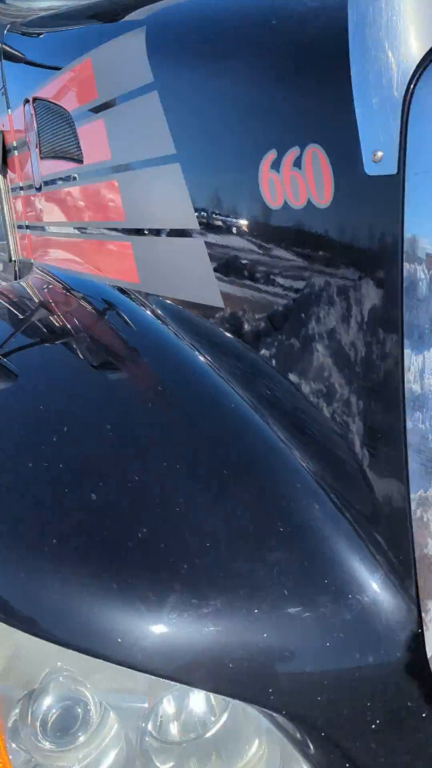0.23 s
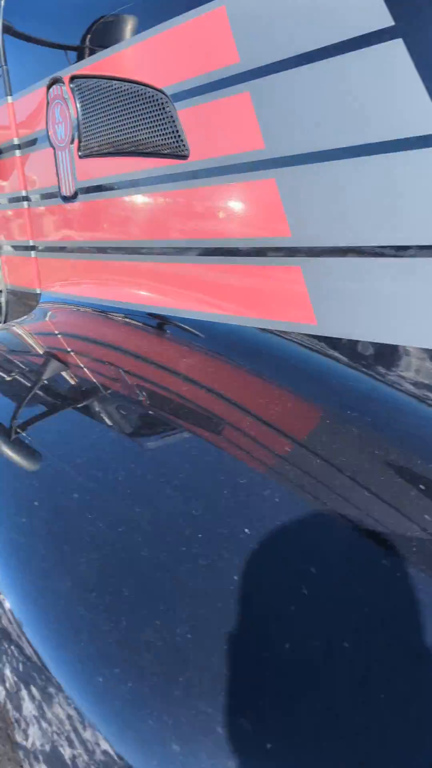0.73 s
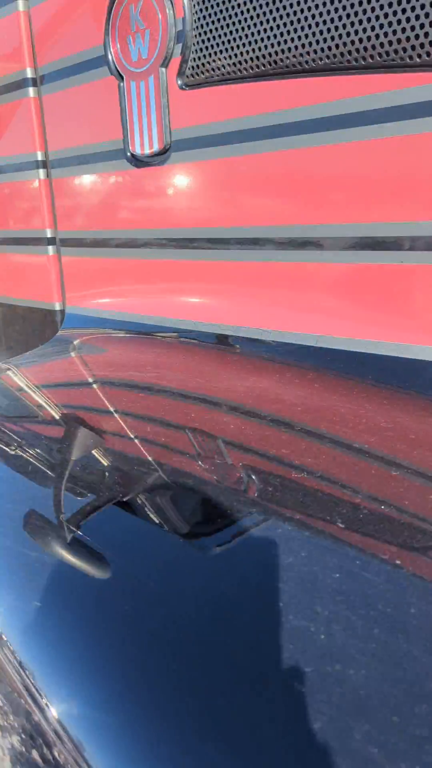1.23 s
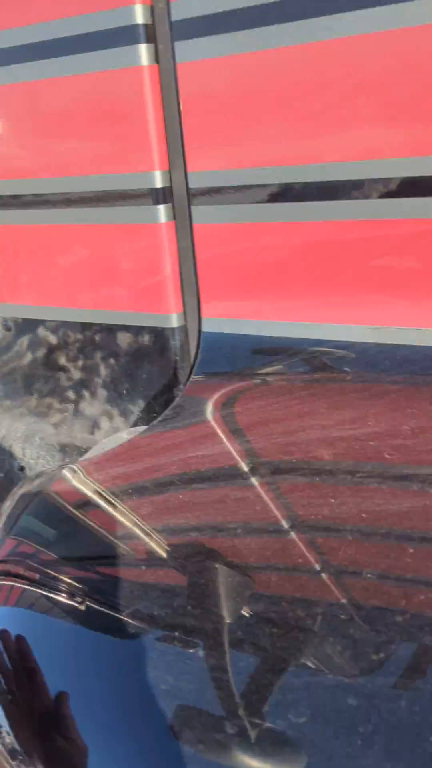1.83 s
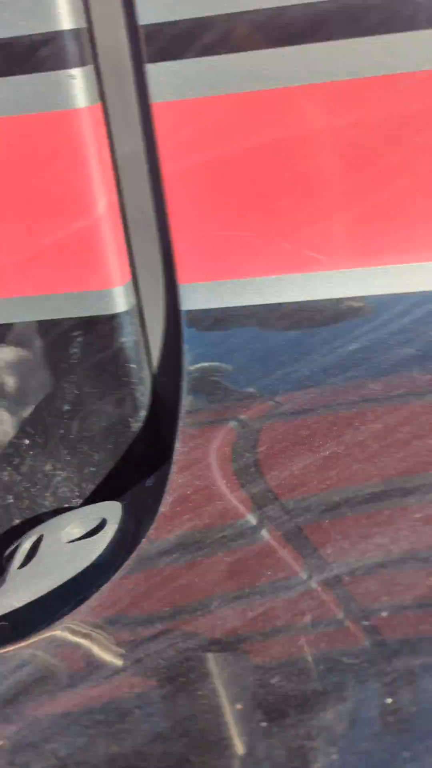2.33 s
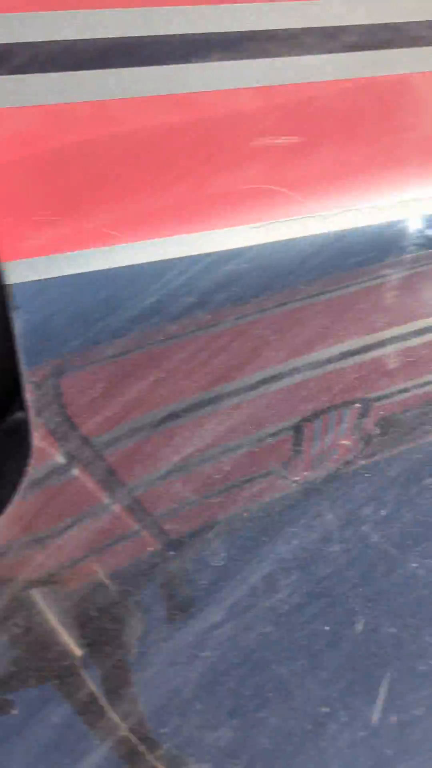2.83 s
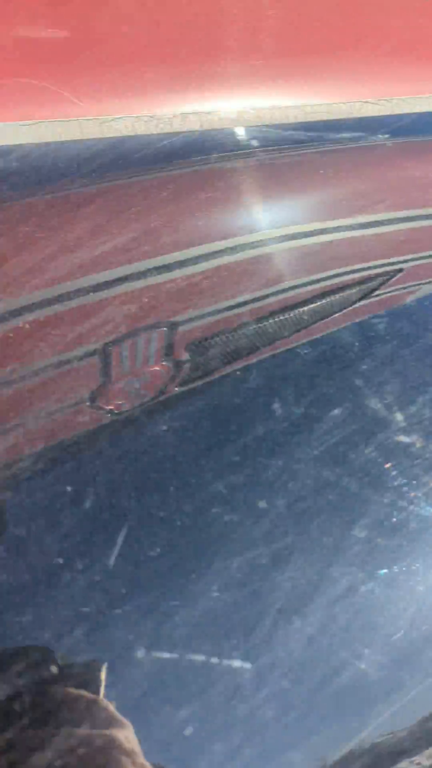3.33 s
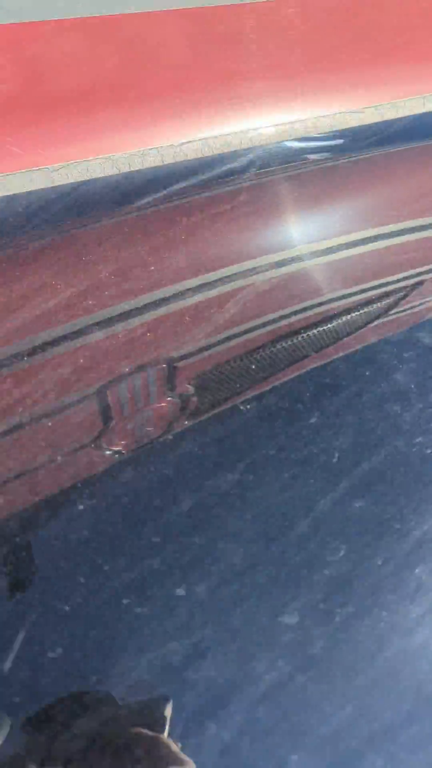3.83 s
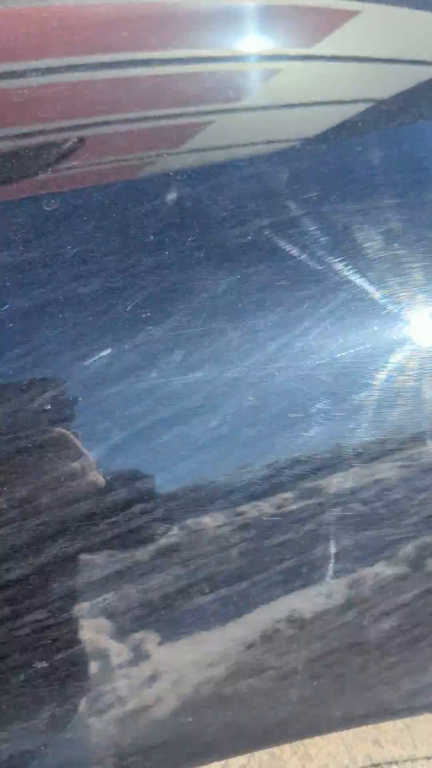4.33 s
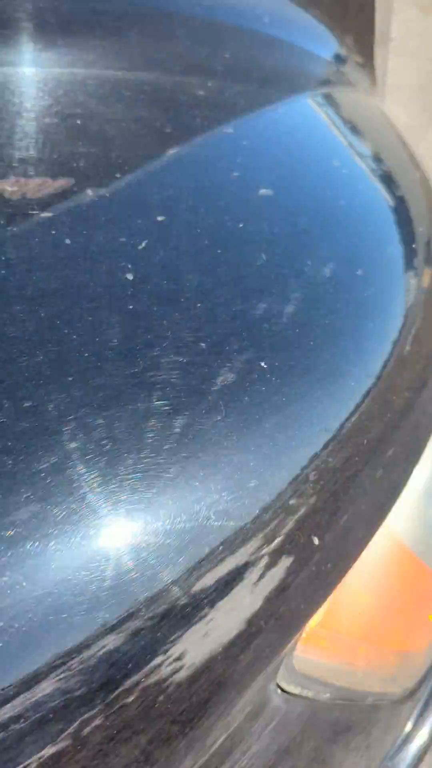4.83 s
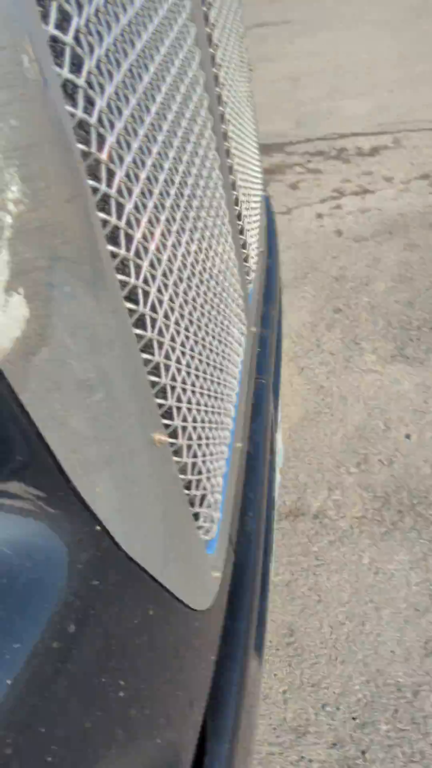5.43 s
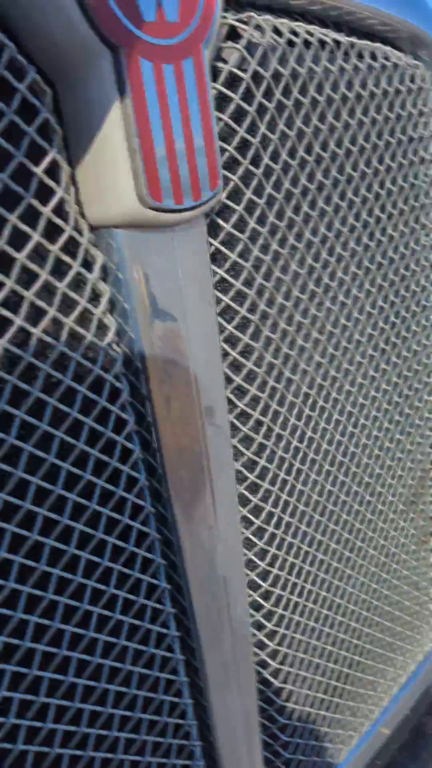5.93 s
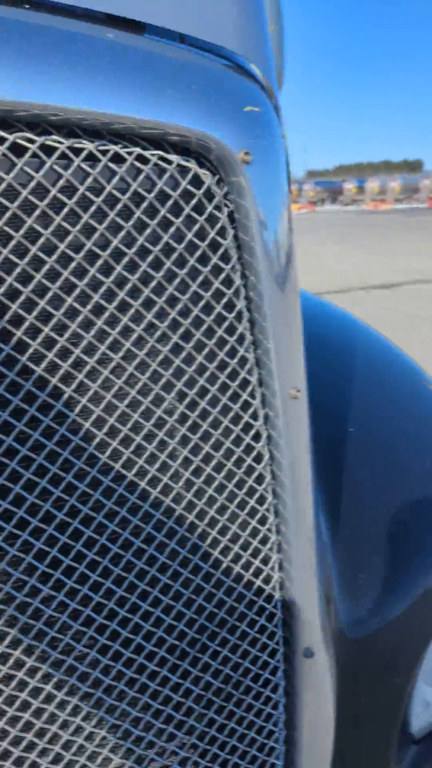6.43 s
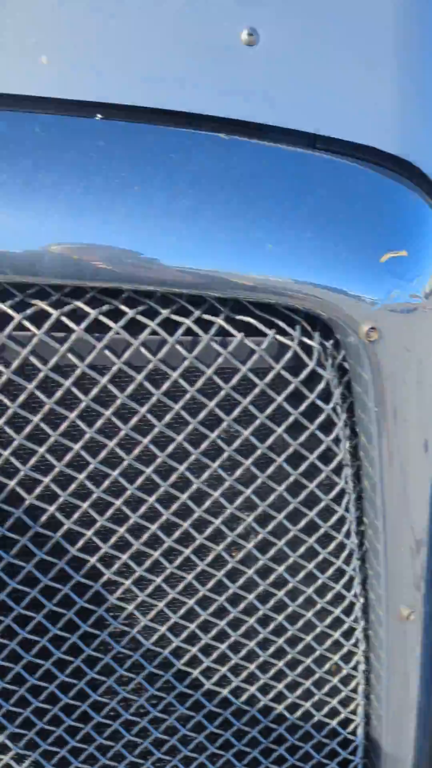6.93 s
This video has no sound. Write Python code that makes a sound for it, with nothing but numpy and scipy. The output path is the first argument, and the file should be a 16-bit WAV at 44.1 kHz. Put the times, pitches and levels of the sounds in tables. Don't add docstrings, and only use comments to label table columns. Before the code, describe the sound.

A big diesel truck idles continuously in an open yard, low throbbing rumble under valve clatter and fan hiss. A handheld phone moves from grille to fender and back, so the knocking grows, thins, then turns boomy. Finger knocks and brief rubs hit the panels around three and four seconds; wind flutters at the start and thumps near the end.

```python
import sys
import numpy as np
from scipy import signal
from scipy.fft import rfft, irfft
from scipy.io import wavfile
from scipy.ndimage import uniform_filter1d

SR = 44100
rng = np.random.default_rng(int(sys.argv[2]) if len(sys.argv) > 2 else 0)


def invert_db(x):
    u = np.asarray(x, float) / 20
    return 10 ** u


def wav_out(sig):
    wavfile.write(sys.argv[1], SR, np.round(np.clip(np.atleast_2d(sig).T, -1, 1) * 32767).astype(np.int16))


N = 317079
TIME = np.arange(N) / SR
SIDES = np.array([[1], [-1]])
CYCLE_HZ = 22.85
STEP = 32


def unit(x):
    return x / np.sqrt(np.mean(x ** 2))


def curves(table):
    seconds, *columns = np.transpose(table)
    return [np.interp(TIME, seconds, column) for column in columns]


def gains(table):
    hz, db = np.transpose(table)
    return invert_db(np.interp(np.log(np.fft.rfftfreq(N, 1 / SR) + 1), np.log(hz + 1), db))


def noise(table):
    return unit(irfft(rfft(rng.standard_normal((2, N))) * gains(table), N))


def band(x, lo_hz, hi_hz):
    return signal.sosfilt(signal.butter(2, [lo_hz, hi_hz], "band", fs=SR, output="sos"), x)


def wander(rate, step=1):
    hold, size = int(SR / rate / step), -(-N // step)
    held = np.repeat(rng.standard_normal(size // hold + 1), hold)
    return 1.74 * uniform_filter1d(uniform_filter1d(held, hold), hold)[:size]


def hump(t, middle_s, half_s):
    return np.exp(-((t - middle_s) / half_s) ** 2)


def add(track, sound, s):
    i = int(s * SR)
    track[:, i:i + sound.shape[1]] += sound[:, :N - i]


# time in seconds, closeness to the engine in dB,
# view into the wheel arch 0-1, shading of the engine bay in dB.
STANCE = [(0, 0, 0, -3), (.55, -1, 0.04, -2), (1.0, -0.5, 0.2, -1), (1.6, 0, 0.5, 1), (2.2, 1, 0.87, 0.5),
          (2.7, -1, 0.96, 1), (3.6, 0, 0.93, 2), (3.82, -6.5, 1, 0.5), (4.0, 2.5, 0.89, 2),
          (4.55, -2.5, 0.64, 1.5), (4.87, -8.5, 0.41, -5), (5.15, -8, 0.11, -6.5), (5.45, -3, 0.07, -6),
          (5.78, -0.5, 0.14, -3.5), (6.0, 11, 0.09, -3.5), (6.35, 7.5, 0.19, 0.5), (6.62, 3.5, 0.7, 0),
          (7.19, 9, 0.05, -4)]


def engine_levels():
    close_db, arch, _ = curves(STANCE)
    beat = abs(1 - 0.38 * np.exp(2j * np.pi * 1.155 * (TIME - 0.83)))
    boom_db = -37 + close_db + 20 * np.log10(np.clip(beat, 0.1, 2))
    block_db = -51 + 0.84 * close_db + 14 * np.clip(arch / 0.24, 0, 1)
    knock_db = -54.5 + 0.66 * close_db + 17 * arch
    return [boom_db, block_db, knock_db]


# multiple of the cycle rate, level beside the fender in dB,
# level in front of the grille in dB.
STRONG_ORDERS = [(3, -1.5, -12), (4, -1, 0), (5, -8, -13), (6, -4.5, -12.5), (7, -4, -7), (8, -2, -10.5),
                 (9, -20.5, -27), (10, -5.5, -28.5), (11, -3, -16.5), (12, -10, -3.5), (13, -16.5, -11.5),
                 (14, -19.5, -15), (15, -18, -13.5), (16, -9, -23), (17, -9, -9.5), (18, -2.5, -25),
                 (19, 0.5, -15.5), (20, -16.5, -29), (21, -24.5, -25), (22, -10, -16.5), (23, -5.5, -34),
                 (24, -9, -17.5), (25, -15, -24), (26, -25.5, -41.5), (28, -10.5, -26.5), (29, -7.5, -12),
                 (30, -23.5, -39.5), (31, -6.5, -31), (32, -28, -44), (34, -31.5, -40.5), (35, -22, -30.5),
                 (38, -30, -45), (43, -15, -48.5), (44, -27, -47), (45, -28.5, -45), (46, -30, -59.5),
                 (49, -10, -50)]


def orders(count=50):
    weak_db, fall_db = np.array([-10, -16]), np.array([0.7, 0.85])
    rows = {k: (k, *(weak_db - k * fall_db)) for k in range(2, count + 1)}
    rows.update({round(row[0]): row for row in STRONG_ORDERS})
    return [(1, -29, -29), *rows.values()]


# time in seconds, share of grille sound 0-1, extra path in metres,
# lag of the left port in samples, left minus right in dB.
WALK = [
    (0, 1, 0.21, -19, 1),
    (.5, 0.69, 0.091, -4, -1),
    (1.5, 0.16, -0.19, 2, -1.4),
    (2.5, 0.36, -0.95, 10.5, -1),
    (3, 0.28, -0.59, 14, -1),
    (3.6, 0.47, -0.69, 12.5, -0.5),
    (4.5, 0.09, 0.08, 13, -1.5),
    (5.1, 0.6, 0.85, -6.5, 0),
    (5.6, 0.62, 0.83, -2, -0.5),
    (7.19, 0.93, 1, -8, -1),
]
ARRIVAL = [(3, 1.27), (5, 1.2), (7, .94), (11, .86), (14, .76), (20, .7), (23, .3), (25, .9)]
# order, middle in seconds, half length in seconds,
# level change in dB.
SPOTS = [(3, .1, .3, 4), (3, 5.3, .6, 4.5), (4, 5.72, 0.35, -5.5), (4, 6.1, 0.099, 2.5),
         (6, 1.4, 0.45, -7.5), (6, 5.27, 0.17, 9.5), (7, 0.66, 0.61, 6.5), (7, 3.0, 0.66, 2.5),
         (7, 4.68, 0.36, 7.5), (8, 1.27, 0.54, -2), (8, 5.7, 0.2, -4.5), (8, 4.8, .4, -7.5),
         (8, 4.05, .25, 5.5), (8, 5.1, .15, 2), (10, 4, 0.39, -12), (7, 6.34, .3, -11), (12, 5.3, 0.53, 1),
         (16, 6.2, 0.47, 6.5), (14, 3.5, .45, -20), (9, 4.95, .3, 12), (3, 6.1, .2, -2.5),
         (9, 2.4, 1.2, 7.5), (10, 1.6, 0.52, -7), (10, 8.6, .25, -5), (12, 1.86, 0.3, 6.5),
         (12, 2.8, .6, -4), (11, 5.1, 0.18, 2), (12, 5.1, 0.45, -7), (13, 2, 0.79, 7), (13, 3.2, 0.78, -5),
         (13, 5.4, 0.27, -25), (15, 1.55, 0.7, 14.5), (15, 6.26, .3, 11.5), (16, 1.9, .8, -9.5),
         (16, 6.9, 0.46, 6), (17, 1.4, 0.97, 7), (17, 4.6, 0.33, -8.5), (17, 4.9, .25, 9),
         (18, 1.44, 0.15, 2), (18, 1.9, 0.67, 2.5), (18, 5.6, .4, 8), (19, 0.73, 0.23, -3.5),
         (19, 2.25, 0.16, 3), (19, 4.95, .25, -3), (24, 5, 0.56, 4), (24, 6.5, 0.46, -3.5),
         (29, 1.15, 0.43, -21), (29, 2.2, 0.5, -4.5), (29, 4.7, 0.39, -13), (29, 6.62, 0.38, -18)]


def drone(levels_db):
    share, path_m, lag, _ = curves(WALK)
    turn = np.exp(2j * np.pi * CYCLE_HZ * (TIME - path_m / 343 - lag / SR * SIDES / 2))
    slow_time, share, knock_db = TIME[::STEP], share[::STEP], levels_db[2][::STEP]
    bay_db = 0.92 * curves(STANCE)[2][::STEP]
    rows = orders()
    delays = 2 * np.pi * np.cumsum(np.interp(np.arange(len(rows) + 1), *np.transpose(ARRIVAL)))
    groups, powers, carrier = np.zeros((3, 2, N)), np.zeros((3, len(share))), 1
    for k, fender_db, grille_db in rows:
        k = round(k)
        carrier = carrier * turn
        group = int(k > 4) + int(k > 13)
        shade_db = (k > 20) * 0.5 * np.clip(knock_db + 40.5, -9, 0) * (1 - share)
        shade_db = shade_db + (8 < k < 14) * bay_db
        gain = invert_db(fender_db + share * (grille_db - fender_db) + shade_db)
        powers[group] += gain ** 2 / 2
        apart = k * wander(0.7, STEP) * SIDES
        phase = 0.12 * wander(2.99, STEP) + 0.0083 * apart - delays[k]
        phase = phase + (k > 4) * 1.2 * share * wander(1.188, STEP)
        spot_db = sum(db * hump(slow_time, s, half_s) for m, s, half_s, db in SPOTS if round(m) == k)
        drift_db = 1.3 * wander(2.628, STEP) + 0.027 * apart[:, ::-1]
        swell = gain * invert_db(spot_db + drift_db) * np.exp(1j * phase)
        groups[group] += (swell.repeat(STEP, axis=1)[:, :N] * carrier).real
    return sum(g / np.sqrt(p).repeat(STEP)[:N] * invert_db(db) for g, p, db in zip(groups, powers, levels_db))


# frequency in Hz, level in dB per Hz.
RUMBLE_COLOUR = [(20, -26), (40, -15), (65, 2.5), (110, 1), (170, -1), (250, -5), (330, -12), (450, -8),
                 (700, -21), (1100, -46), (1600, -56)]


def rumble(boom_db, block_db, knock_db):
    mid, side = noise(RUMBLE_COLOUR)
    side = 0.32 * side + 0.4 * band(side, 380, 1500)
    throb = 1 + 0.58 * np.cos(2 * np.pi * CYCLE_HZ * TIME + 0.72)
    level_db = 0.26 * boom_db + 0.2 * block_db + 0.3 * knock_db - 17
    level_db = level_db + 4.5 * curves(WALK)[0] + 0.87 * wander(9.7)
    return (mid + side * SIDES) * throb * invert_db(level_db)


# frequency in Hz, level in dB per Hz.
CLATTER_COLOUR = [(460, -12), (780, 0.5), (909, -3), (1150, -8), (1300, -6), (1580, -8.5), (1870, -5),
                  (2190, -10), (2540, -10.5), (3110, -15), (3380, -16), (4100, -24), (5330, -37),
                  (9020, -120)]
# frequency in Hz, level in dB per Hz.
HISS_COLOUR = [(2410, -44.5), (4100, -9), (4870, -8), (5300, -2), (5990, -6), (6360, -1), (6730, 0.5),
               (7770, -7.5), (8640, -8), (9660, -18.5), (11900, -20), (14700, -25.5), (15500, -28),
               (16100, -50)]


def gear():
    shade_db = curves(STANCE)[2]
    vent_db = 2.5 * hump(TIME, 1.25, 1)
    clatter_db = -52.5 + 0.75 * shade_db + vent_db
    hiss_db = -56 + 1.05 * shade_db - 2.5
    beat = 1 + 0.1 * np.cos(4 * np.pi * CYCLE_HZ * TIME + 0.5 * wander(16))
    clatter = noise(CLATTER_COLOUR) * invert_db(clatter_db + 0.6 * wander(6.4) + 0.6 * wander(60))
    clatter = clatter + band(clatter, 2170, 4700) * invert_db(-2.5) * hump(TIME, 5.88, 0.37)
    hiss = noise(HISS_COLOUR) * invert_db(hiss_db + wander(14) + 0.87 * wander(60))
    return beat * (clatter + hiss)


# frequency in Hz, level in dB.
NEIGHBOUR = [(31.5, -64.5), (39.5, -60.5), (54.3, -48)]


def neighbour():
    out = np.zeros((2, N))
    for hz, db in NEIGHBOUR:
        swell = invert_db(db - 1 + 0.4 * wander(2.1) + 2.8 * wander(15))
        lead = (0.23 + 0.12 * wander(1.4)) * SIDES
        out += swell * np.sin(2 * np.pi * hz * TIME + 0.8 * wander(1.6) + lead)
    return out


# frequency in Hz, level in dB per Hz.
WIND_COLOUR = [(30, -36), (70, 3.5), (130, 5), (250, -3), (400, -8.5), (700, -31.5), (1200, -91)]
# middle in seconds, half length in seconds, left port in dB, right port in dB.
GUSTS = [(0.083, 0.11, -36, -30.5), (0.397, 0.097, -52, -41), (0.59, 0.075, -41, -40),
         (0.675, 0.045, -47, -35.5), (0.9, 0.0685, -46, -44), (4.047, 0.033, -28, -33),
         (4.26, 0.12, -38.5, -40.5), (4.511, 0.37, -48, -50), (6.034, .07, -56, -43),
         (6.137, 0.12, -52, -60), (6.27, 0.076, -52, -29), (6.5, 0.089, -35, -30),
         (6.707, 0.068, -26.5, -29), (6.953, 0.15, -30.5, -25), (7.15, 0.086, -33, -27.5)]
# start in seconds, peak level in dB, left minus right in dB.
SLAPS = [(0.048, -43.5, -8.5), (0.071, -42, -2), (0.113, -33, 3), (0.348, -37.5, -3), (0.661, -40, 2),
         (4.266, -30.5, 0.5), (6.223, -49.5, -12), (6.527, -31.5, 6.5), (6.562, -34, -3), (6.614, -35, -1),
         (6.711, -33, 2), (6.781, -33, 1), (6.889, -34.5, -13), (6.906, -31.5, -9.5), (6.947, -30.5, -6.5),
         (6.969, -30.5, -3), (7.003, -29.5, -2.5), (7.018, -30.5, -3), (7.1, -26, 0.5), (7.153, -30.5, 9),
         (7.178, -28, 0)]


def wind():
    out = np.zeros((2, N))
    for s, half_s, *ports_db in GUSTS:
        out += invert_db(ports_db)[:, None] * hump(TIME, s, half_s)
    flutter = noise(WIND_COLOUR) * invert_db([5 * wander(32), 4.3 * wander(35)])
    out = out * flutter / np.sqrt(uniform_filter1d(flutter ** 2, 5000)) * invert_db(1.5)
    t = TIME[:2600]
    for s, db, pan_db in SLAPS:
        burst = rng.standard_normal((2, len(t))) * np.exp(-t / 0.012) * (1 - np.exp(-t / 0.00049))
        puff = band(band(band(burst, 60, 1600), 74, 1070), 94, 402)
        puff = puff / abs(puff).max(axis=1, keepdims=True)
        add(out, puff * invert_db(db + 6 + 2.71 * pan_db * SIDES / 2), s)
    return out


def hollow(x, top_hz):
    return band(band(x, 1280, top_hz), 810, 0.95 * top_hz)


# start in seconds, end in seconds, rasp in dB, panel hum in dB, edge sharpness.
RUBS = [(1.185, 1.302, -64, -66, 1.4), (2.29, 2.347, -63, -78, 1.3), (2.577, 2.724, -57.5, -65.5, 5.3),
        (2.635, 2.68, -58, -60, 1.4), (2.876, 2.899, -46.5, -48, 1.3), (3.279, 3.323, -58, -45, 2),
        (3.304, 3.327, -52, -47, 2), (3.329, 3.377, -55, -61, 1.1), (3.399, 3.475, -43.5, -50, 5.6),
        (3.422, 3.471, -41.5, -48, 1.55), (3.757, 3.78, -38, -51, 5), (4.024, 4.038, -36.5, -38, 1.5),
        (5.172, 5.286, -57, -59.5, 1.15), (6.371, 6.5, -47.5, -61, 1.12), (6.429, 6.662, -57, -75, 1.57)]
# start in seconds, end in seconds, rasp in dB,
# panel hum in dB, edge sharpness.
TRAILS = [
    (2.891, 2.905, -38.5, -36, 1.6),
    (2.906, 2.942, -56, -46, 1.2),
    (4.0035, 4.028, -29.5, -29.5, 1.1),
    (4.037, 4.061, -42, -27, 1.7),
    (6.656, 6.719, -53.5, -45, 2.1),
    (6.716, 6.77, -68, -48.5, 1.8),
]


def slides(body, rasp, top):
    for start, end, rasp_db, panel_db, edge, skew in [(*r, 1) for r in RUBS] + [(*r, 0.45) for r in TRAILS]:
        size = int((end - start) * SR)
        grain_db = 3.6 * rng.exponential(size=size // 90 + 1)
        grains = rng.standard_normal((2, size)) * invert_db(grain_db).repeat(90)[:size]
        arc = np.sin(np.pi * (np.arange(size) / size) ** skew)
        slide = unit(grains) * np.clip(edge * arc, 0, 1) ** 2
        late = start > 6.34
        scrape = slide
        if late:
            peaks = band(slide, 5080, 5450) + band(slide, 6450, 7000)
            scrape = slide * invert_db(2) + peaks * invert_db(3.5)
        add(rasp, scrape * invert_db(rasp_db), start)
        pressed_db = 0.63 * max(panel_db - rasp_db + 6, 0)
        add(top, slide * invert_db(rasp_db + 4 - 5.1 * late - pressed_db), start)
        add(body, hollow(slide, 2880) * invert_db(panel_db + 11), start)


# frequency in Hz, level in dB, 60 dB decay in seconds.
REAR_PANEL = [(1555, -17, 0.092), (1656, 1, 0.088), (1800, 7, 0.055), (1960, 5, 0.026), (2186, 7.5, 0.028),
              (2390, -9, 0.033), (2275, -7, 0.095)]
# frequency in Hz, level in dB, 60 dB decay in seconds.
FRONT_PANEL = [(1333, -3.5, 0.065), (1464, -11, 0.05), (1590, -21, 0.043), (1704, -3, 0.034),
               (1782, -1, 0.043), (1960, -4.5, 0.05), (2230, -4.5, 0.028), (2620, -25, 0.093),
               (637.5, -13, 0.055)]
# frequency in Hz, level in dB, 60 dB decay in seconds.
NAIL = [(1330, 2, .04), (5400, 7, 0.007), (4400, -2, .006), (6700, 3, .012), (8500, 3, .01),
        (11700, 5, 0.005), (12600, 11, .006)]
# frequency in Hz, level in dB, 60 dB decay in seconds.
MESH = [(1160, -13.5, 0.028), (1720, -20, 0.11), (2340, 2, 0.02), (2960, 3, 0.024), (3630, -4, 0.023),
        (4820, -2.5, 0.022), (5500, -5, 0.014), (6260, -16, 0.014), (7400, -12, .012)]
# frequency in Hz, level in dB, 60 dB decay in seconds.
CORNER = [(2270, 1, 0.087), (2080, -4, 0.066), (2620, -7, .03), (1500, -10, 0.044), (1160, -6, 0.07)]
# frequency in Hz, level in dB, 60 dB decay in seconds.
CASE = [(3340, -10.5, 0.0064), (5180, 7.5, 0.0044), (6440, 4.5, 0.006), (8150, -5, 0.0057),
        (10900, -17, 0.0056), (11880, -20, 0.005)]
PLACES_S = [
    0,
    3.72,
    3.78,
    3.9,
    4.2,
    6.3,
    6.34,
    6.7,
    6.9,
]


def ringing(push, s, contact_s):
    t = TIME[:5000]
    front = FRONT_PANEL + NAIL if abs(s - 4.035) < 0.004 else FRONT_PANEL
    places = (REAR_PANEL, CASE, REAR_PANEL, front, REAR_PANEL, MESH, REAR_PANEL, CORNER, CASE)
    modes = places[np.searchsorted(PLACES_S, s) - 1]
    ring = np.zeros(len(t))
    for hz, db, t60 in modes:
        ring += invert_db(db) * np.sin(hz * (2 * np.pi * t + 1)) * np.exp(-np.log(1000) * t / t60)
    ring = ring * (1 - np.exp(-(t / contact_s) ** 2))
    ring = signal.fftconvolve(push, ring[None])[:, :push.shape[1]]
    return ring / abs(ring).max()


# start in seconds, crack in dB, left minus right in dB.
TICKS = [(1.25, -46, -11), (2.31, -53.5, 14), (3.666, -45, -1), (3.7356, -44, -5), (3.7399, -24.5, -6),
         (3.7737, -32, -11), (3.9058, -52, 4), (4.25, -46.5, -8), (5.0204, -53.5, -6.5),
         (5.449, -58.5, 11.5), (6.11, -52, -1), (6.425, -55, -10), (6.449, -50, -14), (6.9833, -45, -18),
         (7.108, -57, -10), (7.163, -50.5, 10)]
# start in seconds, ring in dB, nail crack in dB, body thud in dB,
# left minus right in dB.
KNOCKS = [(2.6423, -35, -56, -54, -1), (2.6602, -39, -47, -35, -5), (2.8939, -13, -35.5, -25.5, -0.5),
          (2.8981, -18.5, -50, -41, -1.5), (3.2912, -41, -60, -44, 2), (3.2943, -32, -58, -39, 0),
          (3.3012, -40, -57, -54, -5), (3.3072, -30, -38.5, -30.5, -4), (3.313, -28, -41, -39, -1),
          (3.3185, -47, -54, -43, 2), (3.34, -38, -57, -43, -3), (3.43, -42, -60, -40, 0),
          (4.006, -22, -25, -22, 8), (4.0352, -5, -22.5, -43, 4), (4.041, -10.5, -43.5, -22.5, 1),
          (4.048, -28, -45, -37, 0.5), (6.0001, -39.5, -54, -44, -3), (6.064, -43.5, -66, -36, 6),
          (6.328, -18, -34.5, -41, -6), (6.348, -36.5, -58, -38, 0), (6.718, -36.5, -52, -36, -3)]


def tap_list():
    knocks = [(s, ring, crack, crack - 20 + 0.67 * (ring - thud), thud, pan)
              for s, ring, crack, thud, pan in KNOCKS]
    ticks = [(s, crack - 3, crack, crack - 8.5, -54, pan) for s, crack, pan in TICKS]
    return knocks + ticks


def taps(body, rasp, top):
    t = TIME[:5000]
    for s, ring_db, crack_db, top_db, thud_db, pan_db in tap_list():
        on_case = 3.72 < s < 3.78 or s > 6.9
        clean = on_case or 6.3 < s < 6.34
        mid, side, tail = rng.standard_normal((3, len(t)))
        pan = invert_db(pan_db * SIDES / 2)
        chatter = (mid + 0.6 * side * SIDES) * np.exp(-t / 0.0053)
        push = (t == 0) + (0.015 if clean else 0.06) * chatter
        hum = (tail + 0.5 * mid * SIDES) * np.exp(-t / 0.017)
        hum = hollow(hum, 2100 if 3.9 < s < 4.2 else 2600)
        contact_s = 0.0014 if clean or 4.03 < s < 4.04 else 0.00022
        ring = ringing(push, s, contact_s) + (0.05 if clean else 0.4) * hum / abs(hum).max()
        if 3.28 < s < 3.35:
            ring = ring * (np.exp(-t / 0.004) + 0.091) * invert_db(1.5)
        if on_case:
            ring_db, crack_db = crack_db + 6.5, crack_db - 12.5
        choke_s = 4.0465
        if 4.03 < s < choke_s:
            ring = ring * invert_db(-3.5 * np.clip((t + s - choke_s) / 0.0011, 0, 1))
        thud = band(mid * np.exp(-t / 0.026), 160, 690)
        thud = thud / abs(thud).max()
        add(body, (ring * invert_db(ring_db - 1.5) + thud * invert_db(thud_db)) * pan, s)
        crack = side * (np.exp(-t / 0.0013) + 0.3 * np.exp(-t / 0.0078)) * (1 - np.exp(-t / 0.0005))
        crack = np.array([crack, np.roll(crack, 5)]) * pan
        add(rasp, crack * invert_db(crack_db + 5), s)
        add(top, crack * np.exp(-t / 0.006) * invert_db(top_db + 16.5), s)


def squeal(body):
    start, end, low_hz, high_hz = 2.63, 2.675, 1780, 2620
    t = TIME[:int((end - start) * SR)]
    u = t / t[-1]
    rough = unit(band(rng.standard_normal((2, len(t))), 20, 450))
    tone = np.sin(2 * np.pi * np.cumsum(low_hz + (high_hz - low_hz) * u) / SR)
    add(body, rough * tone * np.sin(np.pi * u ** 1.3) * invert_db(-43), start)


# start in seconds, peak level in dB.
PALMS = [
    (2.691, -28),
    (3.905, -28),
    (4.001, -25),
]


def palms(body):
    t = TIME[:5000]
    for s, db in PALMS:
        bump = rng.standard_normal(len(t)) * np.exp(-t / 0.021) * (1 - np.exp(-t / 0.005))
        bump = band(band(bump, 145, 242), 145, 242)
        add(body, bump / abs(bump).max() * invert_db(db - 0.9 * SIDES), s)


# frequency in Hz, level in dB per Hz.
RASP_COLOUR = [(710, -42.5), (1200, -38.5), (1770, -14.5), (2040, -9), (3660, -8), (4000, -9.5),
               (4500, -4.5), (5300, -4.5), (5950, -5), (6700, 0.5), (8500, -9), (9800, -14.5), (10500, -15),
               (11800, -14.5), (14800, -18.5), (16000, -56)]


def fingers():
    body, rasp, top = np.zeros((3, 2, N))
    slides(body, rasp, top)
    taps(body, rasp, top)
    squeal(body)
    palms(body)
    near_left = (TIME > 3.39) & (TIME < 4.05) & (SIDES > 0)
    rasp = rasp + band(rasp * near_left, 7700, 10000) * invert_db(1)
    colour = gains(RASP_COLOUR)
    below_top = 1 - gains([(9100, -60), (9900, 0)])
    top_shape = gains([(9400, -34.5), (10300, -3), (11800, -1), (13800, -3), (15800, -8)])
    spectrum = rfft(rasp) * below_top + rfft(top * invert_db(8 * SIDES / 2)) * top_shape
    return body + irfft(spectrum * colour / np.sqrt(np.mean(colour ** 2)), N)


def scene():
    levels_db = engine_levels()
    engine = drone(levels_db) + rumble(*levels_db) + gear()
    bearing = invert_db((curves(WALK)[3] + 1.9) * SIDES / 2)
    return engine * bearing + neighbour() + wind() + fingers()


def top_cut(x):
    return signal.sosfilt(signal.butter(12, 16310, fs=SR, output="sos"), x)


# frequency in Hz, left minus right in dB.
PORTS = [(60, -2), (400, -2), (2000, -5), (4100, 1.5), (4900, -10), (7000, -9.5), (9000, -3.5),
         (11000, 6.5), (12300, 6), (14000, -2)]


def record(dry):
    tilt = np.sqrt(gains(PORTS))
    ports = irfft(rfft(dry) * np.array([tilt, 1 / tilt]), N)
    ports = signal.sosfilt(signal.butter(2, 24, "high", fs=SR, output="sos"), ports)
    return top_cut(ports)


dry = scene()
out = record(dry)
wav_out(out)
```